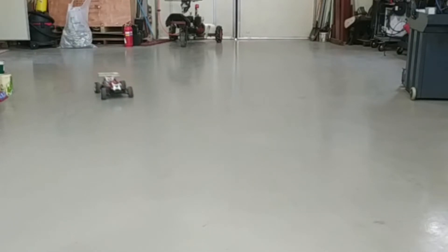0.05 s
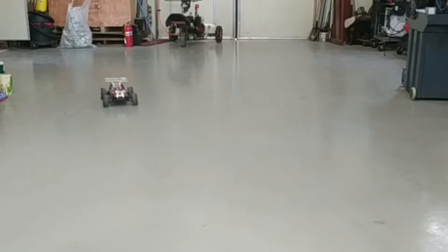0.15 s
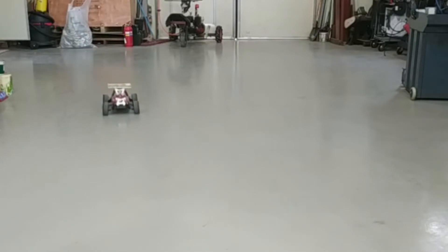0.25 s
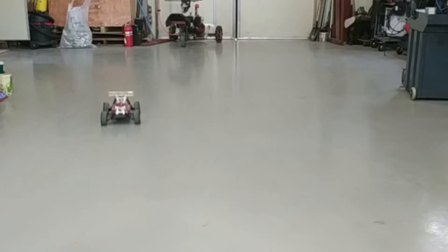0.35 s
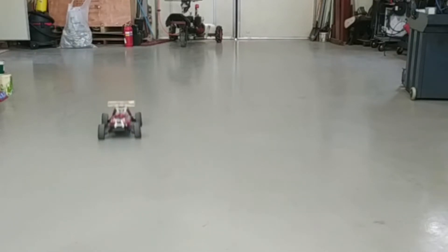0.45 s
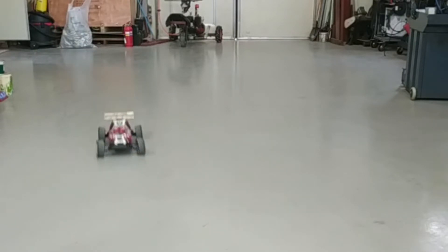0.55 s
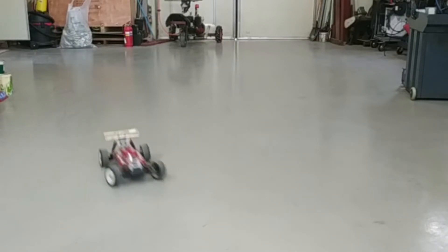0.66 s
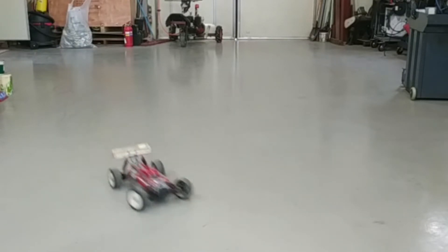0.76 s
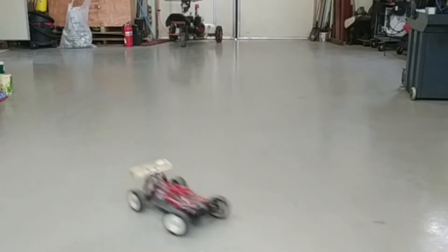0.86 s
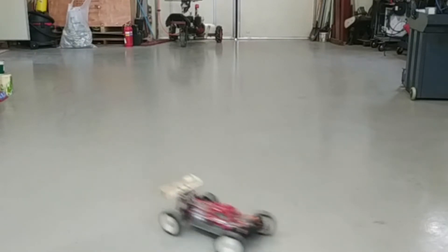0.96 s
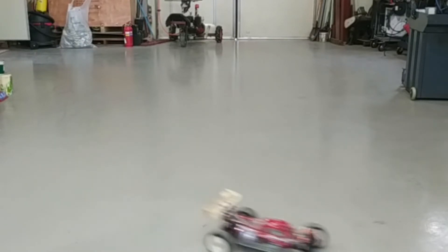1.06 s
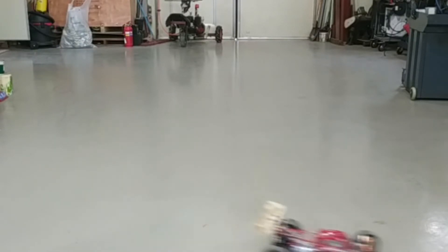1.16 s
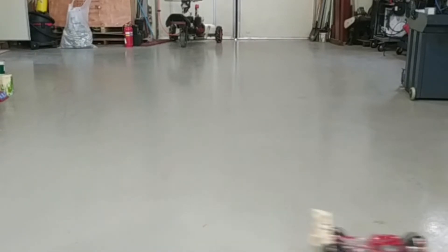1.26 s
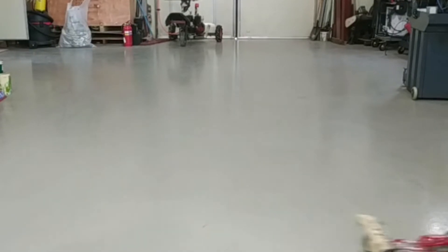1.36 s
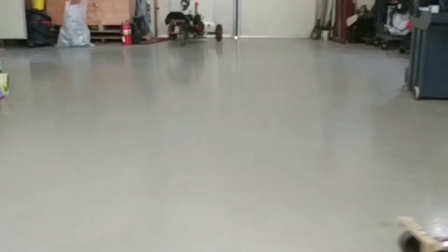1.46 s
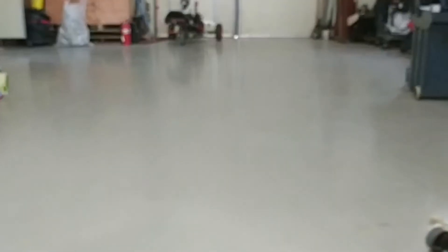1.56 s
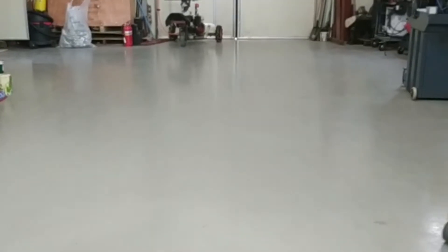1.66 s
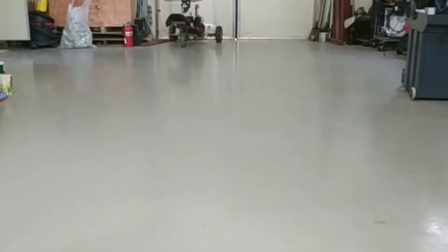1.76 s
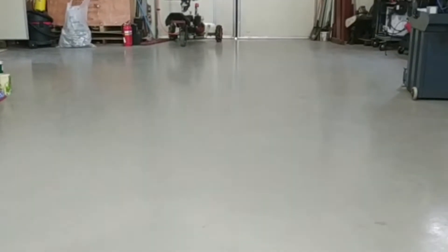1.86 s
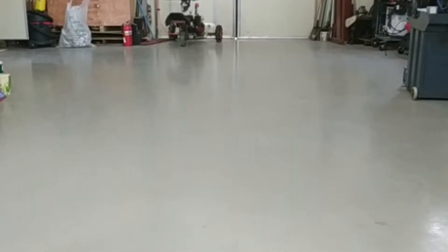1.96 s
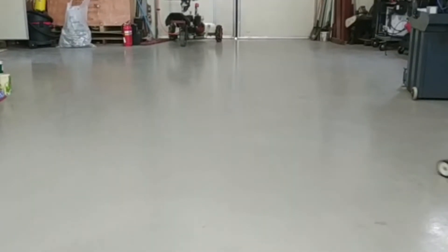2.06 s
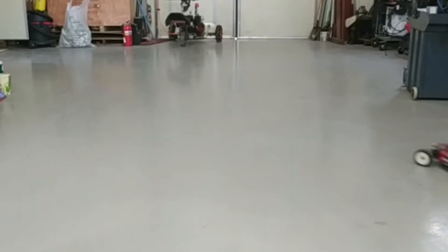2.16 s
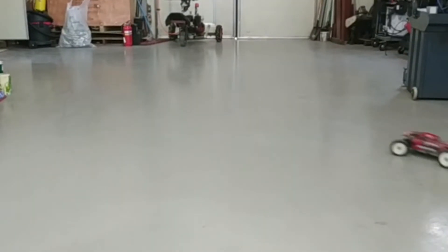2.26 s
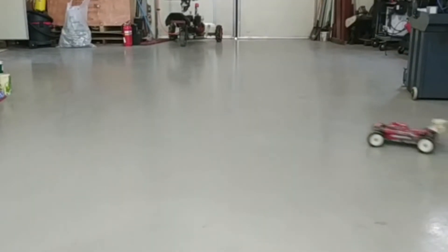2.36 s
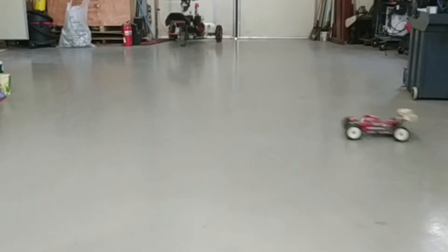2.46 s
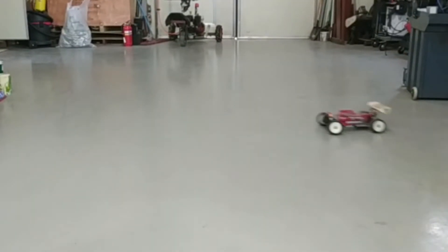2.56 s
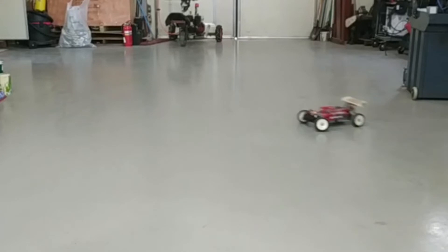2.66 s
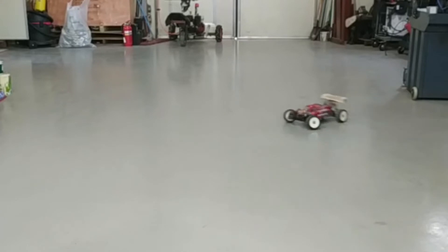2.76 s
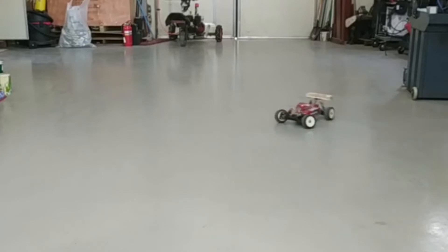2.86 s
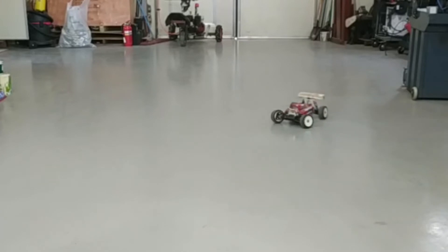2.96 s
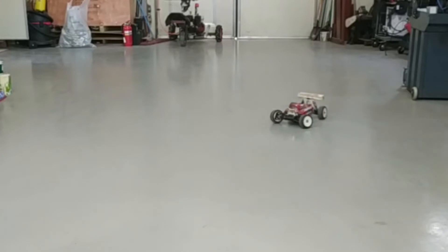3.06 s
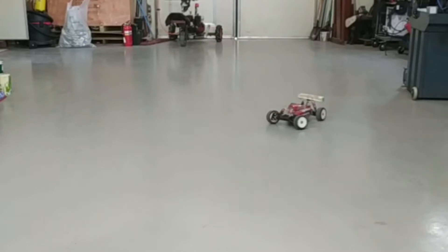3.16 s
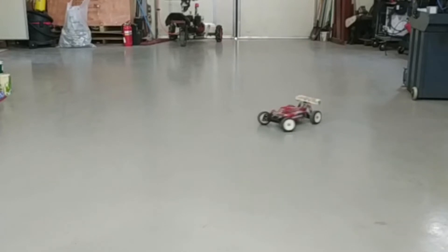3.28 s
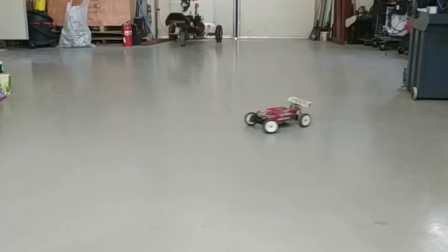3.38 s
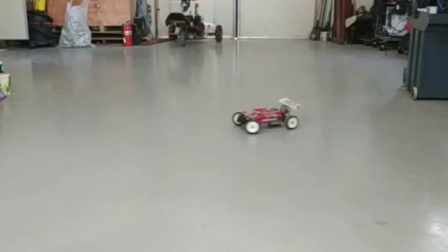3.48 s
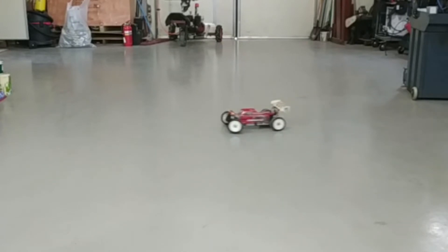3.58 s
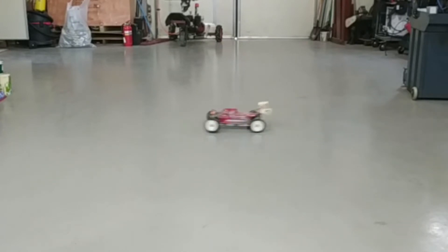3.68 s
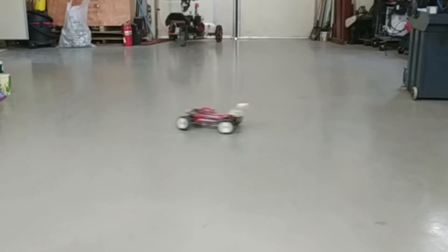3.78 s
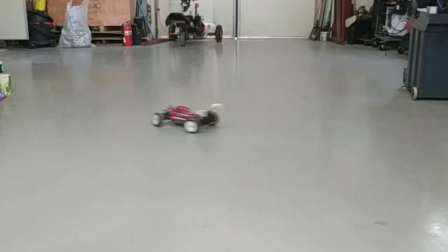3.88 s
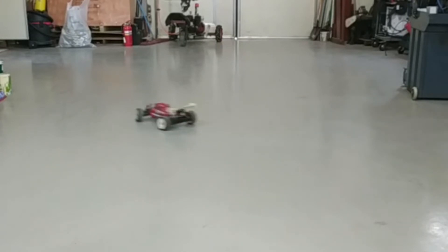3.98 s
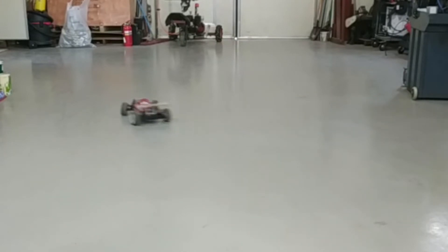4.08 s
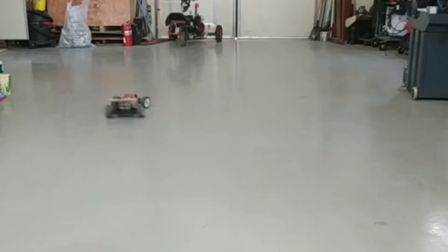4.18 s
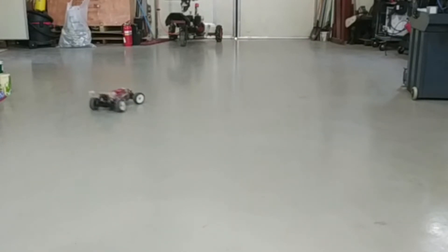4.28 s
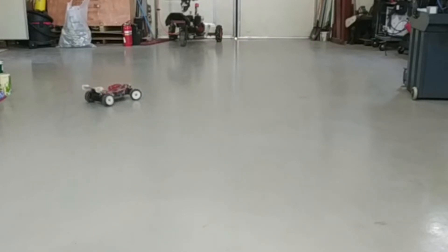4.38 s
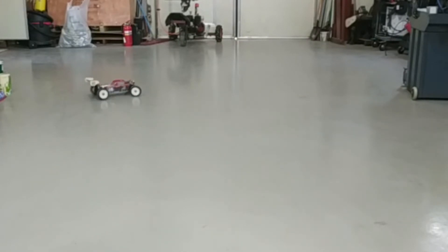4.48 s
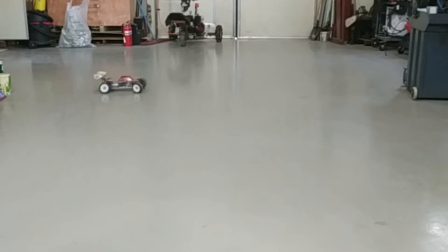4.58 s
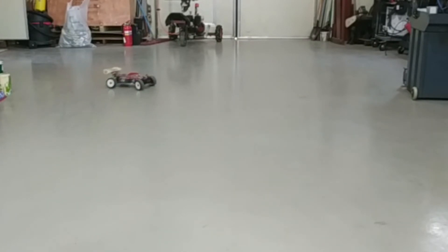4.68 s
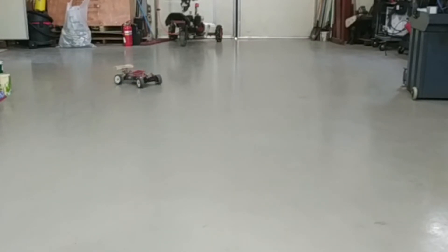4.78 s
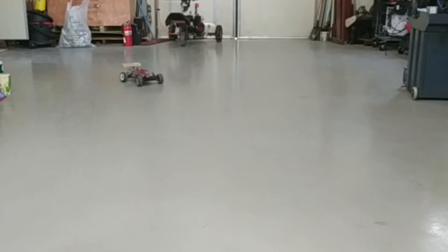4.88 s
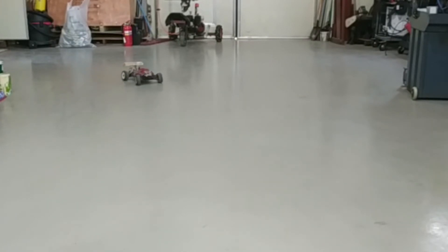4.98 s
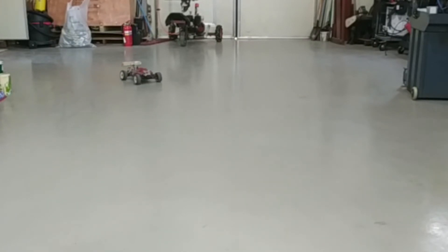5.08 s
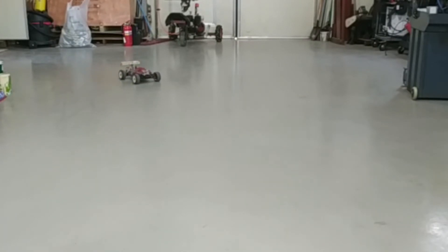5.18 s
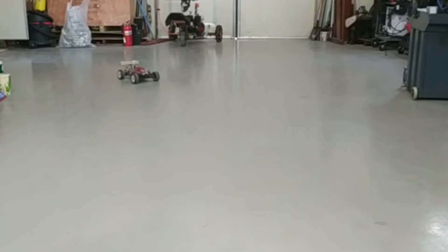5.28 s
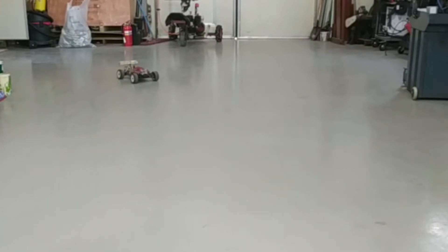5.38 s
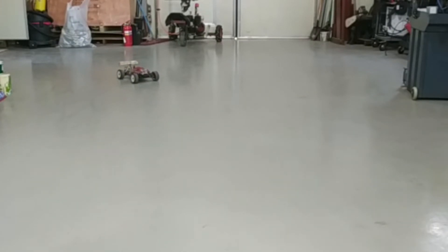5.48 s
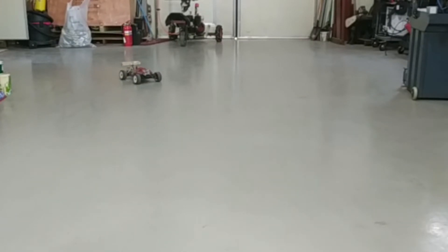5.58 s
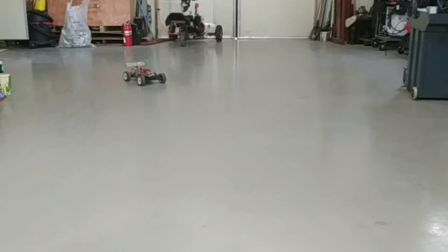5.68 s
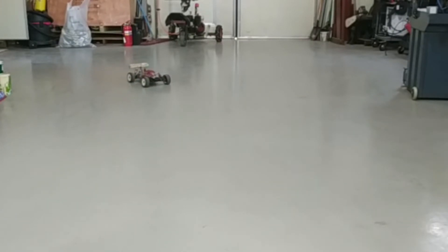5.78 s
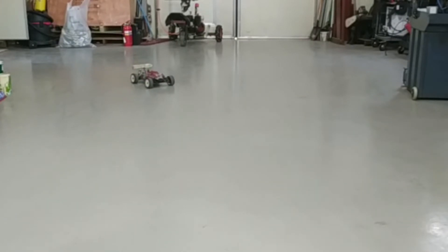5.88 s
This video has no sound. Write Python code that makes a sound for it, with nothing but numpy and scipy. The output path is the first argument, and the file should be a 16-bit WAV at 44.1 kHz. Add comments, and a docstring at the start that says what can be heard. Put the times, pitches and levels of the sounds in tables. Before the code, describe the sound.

Repeated rough, rising whines and gear rattle from an electric toy buggy echo in a hard workshop over faint ventilation hum.

```python
"""A concrete workshop, where an electric model buggy darts about in short bursts of throttle.
Each launch brings a rough, rising squeal, while the motor surges and its switching makes the can sizzle.
Gears rattle through their backlash, body panels ring, the shaft drones on the coast and the tyres scrub;
the drive cracks tight on standing starts and the steering servo hums. The hard room holds on to every
chirp, over a bed of ventilation hum. A gain control ducks the whole mix on the loud bursts."""
import sys
import numpy as np
from scipy import signal
from scipy.fft import rfft, irfft
from scipy.io import wavfile
from scipy.ndimage import map_coordinates

SR = 44100
rng = np.random.default_rng(int(sys.argv[2]) if len(sys.argv) > 2 else 0)


def master_out(mix):
    """Clip the mix to full scale and print it as 16-bit PCM to the path in sys.argv[1]."""
    frames = np.transpose(np.atleast_2d(mix))
    ceiling = np.clip(frames, -1, 1)
    pcm = np.round(ceiling * 32767).astype(np.int16)
    wavfile.write(sys.argv[1], SR, pcm)


N = 261821
T = np.arange(N) / SR
TOP_HZ = 15850
CRUISE_HZ, CRUISE_M = 3000, 2.2  # switching rate and distance at which the running levels hold

# workshop reverb: (frequency [Hz], time to fall 60 dB [s])
ROOM_DECAY = [(200, .7), (1000, 1.6), (2500, 1.4), (6000, 1.1), (14000, .5)]
# the buggy's path: (time [s], distance [m])
BUGGY_DISTANCE = [(0, 2.75), (.5, 2.43), (1, 1.81), (1.3, 1.72), (1.6, 1.31), (2, 1.66), (2.35, 2.2),
                  (2.62, 2.9), (3, 3.9), (3.4, 2.16), (3.9, 1.82), (4.25, 1.68), (4.68, 2.29), (4.97, 4.7),
                  (5.35, 4.1), (5.94, 3.2)]
# its bearing: (time [s], lead of the right channel [ms])
BUGGY_BEARING = [(0, .09), (.7, .09), (1.25, -.02), (2.1, -.06), (2.25, -.18), (2.45, -.17), (2.75, -.05),
                 (3.3, -.06), (3.8, 0), (4.7, .09), (5.94, .09)]

# EQ curves: (frequency [Hz], relative level [dB])
VENT_EQ = [(25, -35), (60, -22), (100, -11), (150, -3), (210, 0), (280, -4), (400, -4), (700, -7),
           (1250, -3), (1700, -9), (2600, -14), (5000, -26), (15000, -38)]  # moving air
TYRE_EQ = [(80, -91), (160, -2.5), (300, 2), (450, 5.5), (650, 3), (900, 10), (1600, -33)]  # tyres on concrete
PANEL_EQ = [(850, -19), (1130, -4), (1290, 2), (1450, -7), (1900, -13), (2230, -6), (2470, 0), (2760, -5),
            (3200, -20)]  # ringing body panels
GEAR_EQ = [(1500, -20), (2150, -7), (2500, -2), (3050, -3.5), (3500, -.5), (4000, -.5), (4800, -1),
           (5300, -3.5), (6000, -4.5), (7400, -2.5), (8600, -4), (9400, -7), (11000, -8.5), (13000, -11),
           (16000, -19)]  # knocking teeth
CHASSIS_EQ = [(400, -21), (660, -7.5), (900, -4.5), (1100, -2), (1280, 0), (1450, -2.5), (1650, -1.5),
              (1950, -3), (2450, -1), (2750, -2.5), (3200, -9), (4500, -14), (6000, -26)]  # shaken plastic chassis
CRACK_EQ = [(600, -11), (1200, 3), (3000, -12), (8000, -14), (15000, 1)]  # gears snapping tight
CAN_EQ = [(10500, -25), (12000, -14), (12600, -4), (13000, 0), (13500, -5), (14200, -14), (15700, -20)]  # ringing motor can
SWITCHING_EQ = [(4000, -26), (6000, -16), (7200, -12), (9000, -12.5), (11000, -11), (12000, -7),
                (12600, -1.5), (13100, 1), (13600, -1.5), (14200, -4.5), (15700, -7)]  # motor hiss under load
RASP_EQ = [(1100, -14), (1550, -2), (2000, 2), (2400, -3), (3050, -11), (3600, -5), (4300, -1), (4900, -4),
           (5500, -9), (7000, -8), (10000, -22)]  # grit in the squeal
SQUEAL_EQ = [(400, -18), (650, -6), (800, 0), (1150, 3), (1500, -.5), (1900, 1), (2250, -2), (2850, 2),
             (3250, -5), (3750, 0), (4300, 1), (4800, -4), (5600, -6), (9000, -7)]  # resonant peaks of the squeal

# harmonic recipes: (multiple of the pitch, relative level [dB])
SERVO_HARMONICS = [(1, 9), (2, -17), (3, 0)]
SHAFT_HARMONICS = [(1, 0), (2, -1.5), (3, 3), (4, 4.5), (6, 1.5)]
SQUEAL_HARMONICS = [(1, 0), (2, -3), (3, -12), (4, -9), (5, -14), (6, -13), (7, -14), (8, -16)]

# steering servo cues: (middle [s], half length [s], pitch [Hz], level [dB])
SERVO_TURNS = [(5.304, .025, 459.6, -52.5), (5.42, .022, 540, -51.5)]
# drone of the free-rolling drive shaft: (time [s], turning rate [Hz], level [dB])
SHAFT_DRONE = [(0, 425, -46), (.25, 375, -51), (.36, 440, -54), (.48, 435, -42), (.7, 405, -46),
               (.87, 368, -44), (1.05, 305, -48), (1.27, 262, -47), (1.6, 235, -57), (2.25, 480, -54),
               (2.43, 390, -44), (2.7, 280, -68), (4.2, 520, -60), (4.7, 430, -60), (4.97, 375, -58),
               (5.2, 300, -76), (5.6, 340, -59), (5.94, 400, -54)]
# the drive's slack snapping tight on a standing start: (time [s], level [dB])
SLACK_SNAPS = [(3.0495, -29), (5.448, -43)]
# throttle cues: (opens [s], surges [s], run-down starts [s], starting rate [Hz], top rate [Hz],
# braking [exponent, 1 = free roll], hold past the surge [s], sizzle [dB], rattle [dB], clatter [dB])
THROTTLE_BURSTS = [(-.12, -0.06, 0.055, 2430, 2700, 0.91, 0.042, -54, -28.5, -41),
                   (0.241, 0.304, 0.4, 1758, 2850, 1.1, 0.012, -17, -19.5, -34),
                   (1.63, 1.745, 1.67, 933, 1046, 1.07, 0.0043, -22, -30, -38),
                   (1.959, 2.075, 2.25, 1058, 3762, 1.6, 0.055, -16, -21.5, -32.5),
                   (3.047, 3.119, 2.98, 754, 2333, 1.16, 0.084, -25.5, -30.5, -35.5),
                   (3.523, 3.611, 3.67, 1070, 3590, 0.75, 0.036, -22, -27, -34.5),
                   (3.9, 4.003, 3.93, 1206, 3953, .7, 0.021, -19, -21.5, -32),
                   (4.224, 4.362, 4.37, 1699, 3880, 1.94, 0.021, -20, -24.5, -39),
                   (5.451, 5.48, 5.95, 689.3, 1135, 0.14, 0.064, -30, -33.5, -41),
                   (5.884, 5.945, 5.2, 1092, 1772, 0.99, 0.043, -30.5, -37, -41)]
# the squeal, one curve per launch:
# (time [s], pitch [Hz], level [dB], overtone lift [dB], judder [share of pitch])
LAUNCH_SQUEALS = [
    [(0, 2637, -28.5, 5, 0.032), (.12, 2645, -29.5, -7, 0.037), (.2, 2540, -51, -10, 0.038)],
    [(.25, 2050, -34, -6, 0.027), (.275, 1734, -22, -8, 0.096), (.31, 2421, -15.5, -24, 0.022),
     (.35, 2799, -25, -12, .04), (.5, 2734, -31.5, 3, 0.074), (.7, 2600, -46, 1, .07)],
    [(1.61, 680, -45, 6, .06), (1.67, 790, -26, -2, .04), (1.72, 770, -28, 2, .045),
     (1.75, 1060, -30.5, 6, .06), (1.83, 1060, -30.5, 4, .08), (1.93, 1050, -35.5, 1, .08)],
    [(1.95, 1060, -36, -1, .1), (2.005, 1090, -19.5, -9, .1), (2.052, 1520, -22, -8, .05),
     (2.068, 2150, -24, -8, .04), (2.09, 2800, -16.5, -14, .025), (2.103, 3650, -22, -12, .025),
     (2.135, 3800, -35, -10, .04)],
    [(3.048, 600, -52.5, 10.5, .13), (3.1, 899, -31.5, 4.5, .13), (3.118, 1391, -24.5, -9, .13),
     (3.14, 1875, -25, 2, 0.055), (3.175, 2308, -33.5, 3, .08), (3.28, 2250, -34.5, 4, 0.078),
     (3.38, 2097, -42, 2, .078)],
    [(3.53, 800, -41, -1, .14), (3.555, 1100, -32, 6.5, .16), (3.585, 1302, -27.5, 1, 0.073),
     (3.605, 2296, -30, -4, .05), (3.625, 3334, -28, 5, 0.039), (3.68, 3722, -33, -8, .07)],
    [(3.92, 1203, -41, -3, 0.056), (3.957, 1363, -20, -7, .12), (3.99, 1377, -26, -2, .1),
     (4.02, 3002, -28, -10, .05), (4.06, 3700, -45, -8, .05)],
    [(4.16, 1217, -40, 12, .13), (4.235, 1253, -34, 6, .12), (4.29, 1627, -27.5, 3, 0.054),
     (4.35, 1848, -25.5, 1, .055), (4.37, 3300, -27, -13, .06), (4.44, 3700, -39, -12, .07)],
    [(5.44, 500, -43, 8, .07), (5.47, 660, -37, 9, .06), (5.495, 880, -32.5, 6, .06),
     (5.52, 1107, -27, -3, .03), (5.58, 1138, -22, -7, .012), (5.625, 1135, -32, 0, .028),
     (5.72, 1135, -37, -2, .025), (5.82, 1133, -54, -4, .025)],
    [(5.88, 1100, -55, -5, .06), (5.915, 1269, -34.5, -3, 0.11), (5.94, 1490, -33, -6, .088)],
]


def undb(db):
    """Decibels to gain."""
    return 10 ** (np.asarray(db) / 20)


def together_db(a, b):
    """Level of two unrelated gains sounding at once."""
    return 20 * np.log10(np.hypot(a, b))


def unit(x):
    """Scale to rms 1."""
    return x / np.sqrt(np.mean(x ** 2))


def curves(table):
    """A table's columns as automation: straight lines in time."""
    times, *columns = np.transpose(table)
    return [np.interp(T, times, column) for column in columns]


def colour(x, eq, size=2 ** 19):
    """Shape with an EQ curve, rolling off past its ends; rms 1."""
    hz, db = np.transpose(eq)
    f = np.maximum(np.fft.rfftfreq(size, 1 / SR), 1)
    skirt = np.minimum(f / hz[0], 1) ** 2 * np.minimum(hz[-1] / f, 1) ** 2
    gain = skirt * undb(np.interp(np.log(f), np.log(hz), db))
    return unit(irfft(rfft(x, size) * gain)[..., :N])


def wander(rate):
    """Smooth random modulation, changing about rate times a second; rms 1."""
    knots = rng.standard_normal(N // 8)
    return unit(map_coordinates(knots, [T * rate], order=2, mode="wrap"))


def lag(x, seconds):
    """Follow x with a time constant."""
    keep = np.exp(-1 / (seconds * SR))
    return signal.lfilter([1 - keep], [1, -keep], x, zi=[keep * x[0]])[0]


def partials(hz, harmonics, flutter_db):
    """Harmonics of a pitch, each wavering in strength; rms 1."""
    phase = 2 * np.pi * np.cumsum(hz) / SR
    tone = 0
    for k, db in harmonics:
        tone += undb(db + flutter_db * wander(70)) * np.sin(round(k) * phase) * (k * hz < TOP_HZ)
    return unit(tone)


def pan(x):
    """The direct sound reaches left and right a moment apart."""
    lead = curves(BUGGY_BEARING)[0] * SR / 1000
    return np.array([map_coordinates(x, [np.arange(N) + side * lead / 2], order=3) for side in (-1, 1)])


def scatter(x, early_s, drift_hz=2.4):
    """Quick reflections give a steadily shifting, shimmering colour."""
    echoes = 0
    for k in range(12):
        fade = np.cos(2 * np.pi * (k // 2 + 1) ** .8 * drift_hz * T + k * np.pi / 2)
        response = rng.standard_normal((2, SR // 16)) * np.exp(-T[:SR // 16] / early_s)
        echoes += signal.oaconvolve(x * fade, response, axes=1)[:, :N]
    return unit(echoes)


def knocks(rate, spread_db, direct_db, early_s=.0092):
    """Tiny knocks of uneven size, rate a second, heard directly and scattered."""
    hits = (rng.random(N) < rate / SR) * rng.standard_normal(N)
    direct = pan(unit(hits * undb(spread_db * rng.exponential(size=N))))
    return unit(undb(direct_db) * direct + scatter(direct, early_s))


def load(levels_db, attack_s, hold_s, release_db_per_s):
    """Gain of a part under load: swells as the throttle opens, holds past the surge and dies away."""
    power = 0
    holds = np.broadcast_to(hold_s, len(THROTTLE_BURSTS))
    for (opens, surges, *_), db, hold in zip(THROTTLE_BURSTS, levels_db, holds):
        swell = 1 - np.exp(-np.maximum(T - opens, 0) / attack_s)
        fall_db = release_db_per_s * np.maximum(T - surges - hold, 0)
        power += (swell * undb(db - fall_db)) ** 2
    return np.sqrt(power)


def running(hz, db, db_per_octave, nearness, linger_s):
    """Gain of a part that grows with speed and nearness, and lingers in the room."""
    proximity = (CRUISE_M / curves(BUGGY_DISTANCE)[0]) ** nearness
    gain = undb(db + db_per_octave * np.log2(hz / CRUISE_HZ)) * proximity
    return np.sqrt(lag(gain ** 2, linger_s))


def ventilation(air_db=-62, hum_hz=217.7, hum_db=-65.5):
    """The bed: soft air noise with a wavering fan tone, its bass centred."""
    air = colour(rng.standard_normal(N), VENT_EQ)
    side = colour(rng.standard_normal(N), VENT_EQ)
    side = signal.sosfilt(signal.butter(1, 500, "high", fs=SR, output="sos"), side)
    phase = 2 * np.pi * np.cumsum(hum_hz + 3 * wander(27)) / SR
    hum = np.sqrt(2) * np.sin(phase) * undb(hum_db + 2 * wander(14))
    return undb(air_db) * (air + np.array([[.8], [-.8]]) * side) + hum


def workshop(x, early_db=-4, tail_db=-4, early_s=.018):
    """Direct sound, near reflections and a long tail; two echo patterns crossfade to suggest movement."""
    hz, t60 = np.transpose(ROOM_DECAY)
    mix = pan(x)
    for fade in (np.cos(2 * np.pi * T), np.sin(2 * np.pi * T)):
        f, times, noise = signal.stft(rng.standard_normal((2, SR)), SR, nperseg=256)
        decay_s = np.interp(np.log(f + 1), np.log(hz), t60)
        tail = signal.istft(noise * np.exp(-np.log(1000) * times / decay_s[:, None]), SR)[1][:, :SR]
        early = rng.standard_normal((2, SR)) * np.exp(-T[:SR] / early_s)
        response = (undb(early_db) * unit(early) + undb(tail_db) * unit(tail)) / np.sqrt(SR)
        mix += signal.oaconvolve((x * fade)[None], response, axes=1)[:, :N]
    return mix / np.sqrt(1 + undb(early_db) ** 2 + undb(tail_db) ** 2)


def servo(rise_hz_per_s=350):
    """The steering servo gives a short rising hum at each turn."""
    hum = 0
    for middle, half, hz, db in SERVO_TURNS:
        glide = rise_hz_per_s * np.clip(T - middle, -2 * half, 2 * half)
        pitch = (hz + glide) * (1 + .0109 * wander(83))
        swell = undb(db) * np.exp(-((T - middle) / half) ** 2)
        hum += partials(pitch, SERVO_HARMONICS, flutter_db=1.18) * swell
    return hum


def tyres(hz):
    """The tyres scrub the concrete with a low, grainy rush."""
    scrub = colour(knocks(2500, spread_db=2, direct_db=9, early_s=.02), TYRE_EQ)
    return scrub * running(hz, db=-52.5, db_per_octave=4, nearness=1.13, linger_s=.015)


def shaft(wobble=.075):
    """The free-running drive shaft drones unevenly, lower as the buggy slows."""
    hz, db = curves(SHAFT_DRONE)
    return partials(hz * (1 + wobble * wander(170)), SHAFT_HARMONICS, flutter_db=3.5) * undb(db)


def panels(pace):
    """Rolling shakes the body panels, which ring near 1.3 and 2.5 kHz."""
    ring = colour(knocks(4000, spread_db=-.5, direct_db=-10, early_s=.011), PANEL_EQ)
    return ring * running(pace, db=-39, db_per_octave=11.5, nearness=.94, linger_s=.049)


def snaps(decay_s=.003):
    """A short, bright plastic crack as the gears take up their slack."""
    gain = sum(undb(db) * (T >= s) * np.exp(-np.maximum(T - s, 0) / decay_s) for s, db in SLACK_SNAPS)
    return colour(rng.standard_normal(N), CRACK_EQ) * gain


def gears(hz, pace, runout=.026):
    """Teeth knock through their backlash, harder once a turn of the spur gear, and shake the chassis."""
    *_, holds, _, rattles, clatters = np.transpose(THROTTLE_BURSTS)
    rattle_db = together_db(load(rattles, attack_s=.091, hold_s=holds, release_db_per_s=45),
                            running(pace, db=-32.5, db_per_octave=14, nearness=2.62, linger_s=.023))
    clatter_db = together_db(load(clatters, attack_s=.018, hold_s=.3, release_db_per_s=66),
                             running(pace, db=-38, db_per_octave=10.5, nearness=.94, linger_s=.092))
    spur_hz = hz / 6 / 1.2  # six switching steps a shaft turn, then geared down
    spur = 1 + runout * np.sin(2 * np.pi * np.cumsum(spur_hz) / SR)
    rattle = colour(spur * knocks(9000, spread_db=-2, direct_db=-53), GEAR_EQ)
    rattle *= undb(rattle_db + .67 * wander(32))
    clatter = colour(spur * knocks(3500, spread_db=.5, direct_db=-8.5), CHASSIS_EQ)
    clatter *= undb(clatter_db + .27 * wander(30))
    return rattle + clatter


def throttle(surge_s=.03):
    """Switching rate in Hz: the motor labours, surges to top speed, then runs down to the next burst."""
    hz = np.zeros(N)
    for burst, following in zip(THROTTLE_BURSTS, list(THROTTLE_BURSTS[1:]) + [None]):
        opens, surges, closes, start, top, braking = burst[:6]
        speed = start + (top - start) * (1 + np.tanh((T - surges) / surge_s)) / 2
        if following is not None:
            next_opens, _, _, next_start = following[:4]
            run_down = np.interp(T, [closes, next_opens], [1, 0]) ** braking
            speed = next_start + (speed - next_start) * run_down
        hz = np.where(T >= opens, speed, hz)
    return hz


def motor_sizzle(hz, jolt_share=.25):
    """Each switching step jolts the motor can, ringing near 13 kHz; under load it spits a broader hiss."""
    *_, holds, sizzles, _, _ = np.transpose(THROTTLE_BURSTS)
    loaded = load(sizzles, attack_s=.079, hold_s=holds, release_db_per_s=110)
    rolling = running(hz, db=-42.5, db_per_octave=7, nearness=2.34, linger_s=.018)
    step = np.cumsum(hz) / SR % 1
    jolts = np.exp(-step / jolt_share) * knocks(16000, spread_db=2, direct_db=-4.5)
    hiss = colour(jolts, SWITCHING_EQ) * loaded
    ring = colour(jolts, CAN_EQ) * rolling
    return (hiss + ring) * undb(.5 * wander(39))


def launch_squeal(shadow_db=-10, rasp_db=-10, throb=.35, stutter_db=2.2, full_judder=.05):
    """The lead voice: a rough, rising squeal at each launch, cleaner where its pitch judders less."""
    hz, db, lift_db, judder = curves(np.vstack(LAUNCH_SQUEALS))
    sounding = sum((T >= launch[0][0]) & (T <= launch[-1][0]) for launch in LAUNCH_SQUEALS)
    gate = lag(1. * sounding, seconds=.004)
    rough = np.minimum(judder / full_judder, 1)
    hz = hz * (1 + judder * (.8 * wander(220) + .6 * wander(650)))
    harmonics = [(k, level + lift_db * (k > 1)) for k, level in SQUEAL_HARMONICS]
    tone = partials(hz, harmonics, flutter_db=2.5 * rough) * (1 + throb * rough * wander(700))
    # a second tone shadows the squeal from just below
    shadow = partials(hz * .88 * (1 + .04 * wander(300)), [(1, 0)], flutter_db=3.3)
    shadow *= undb(shadow_db) * np.minimum(hz / 2000, 1.4) ** 2
    grit = rng.standard_normal(N) * np.exp(-(np.cumsum(hz) / SR % 1) / .3)  # one puff a cycle
    rasp = colour(grit, RASP_EQ) * undb(rasp_db + lift_db / 2)
    voice = colour(tone + rough * shadow, SQUEAL_EQ) + rasp
    return voice * undb(db + stutter_db * rough * wander(110)) * gate


def scene():
    """The buggy's tones in the workshop reverb, with its rattles and hiss, over the ventilation."""
    hz = throttle()
    pace = lag(hz, seconds=.046)  # the heavy drive train follows the motor a little late
    textures = motor_sizzle(hz) + tyres(hz)
    tones = workshop(launch_squeal() + snaps() + shaft() + servo())
    return tones + textures + gears(hz, pace) + panels(pace) + ventilation()


def record(dry):
    """A fast gain control ducks everything while the sound is loud; a steep low-pass cuts the top."""
    threshold_db, ratio = -31, 5
    level = np.sqrt(lag(np.mean(dry ** 2, axis=0), seconds=.0046))
    ducked = dry / (1 + (level / undb(threshold_db)) ** 4) ** ((1 - 1 / ratio) / 4)
    return signal.sosfilt(signal.ellip(12, .1, 80, TOP_HZ, fs=SR, output="sos"), ducked)


dry = scene()
out = record(dry)
master_out(out)
```